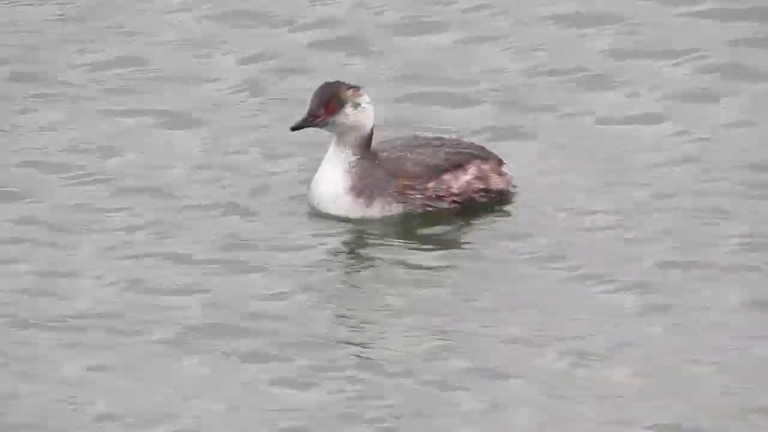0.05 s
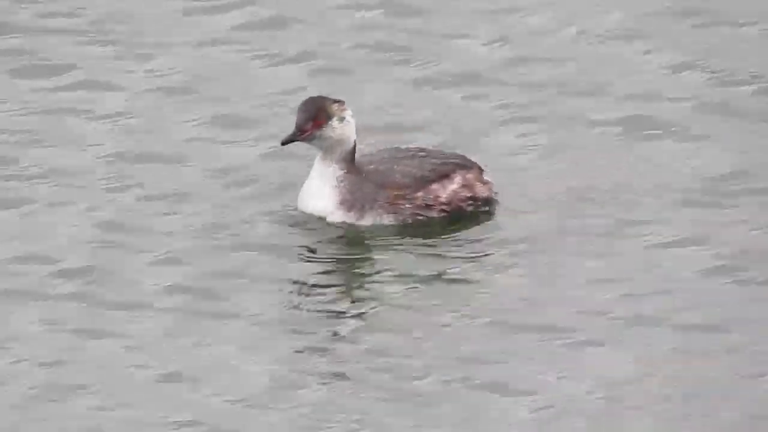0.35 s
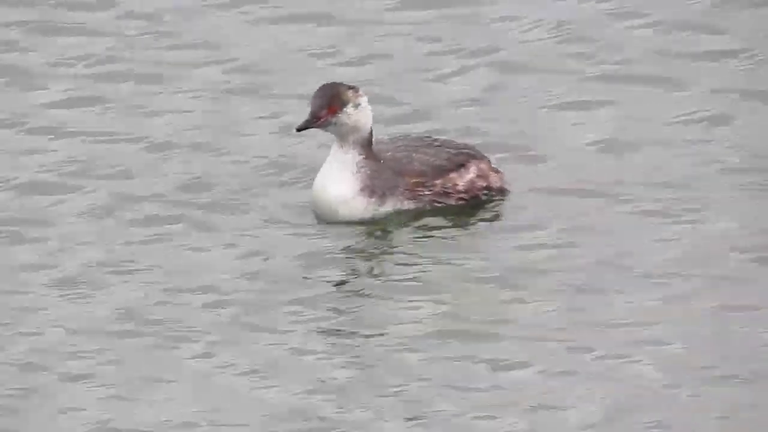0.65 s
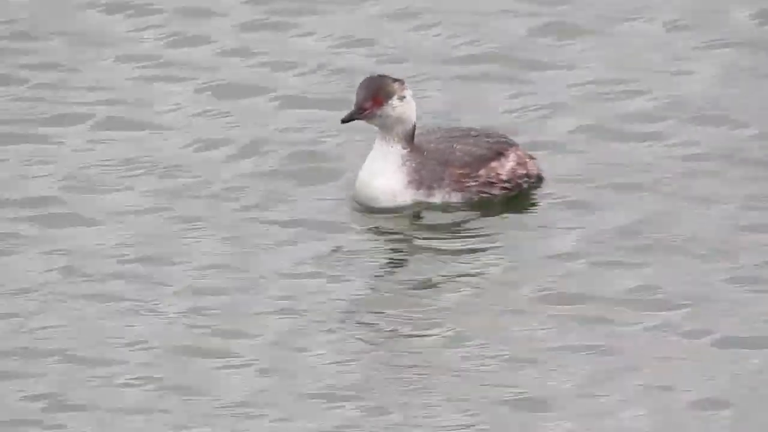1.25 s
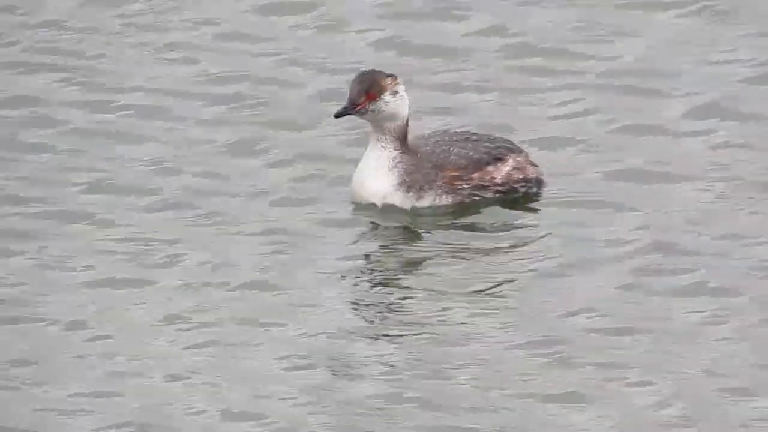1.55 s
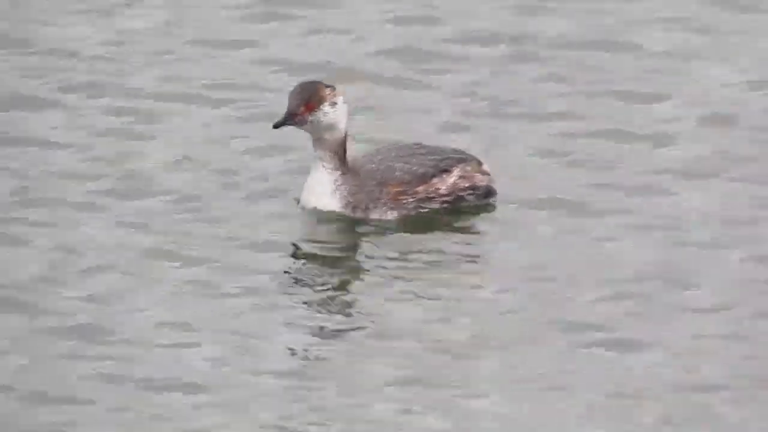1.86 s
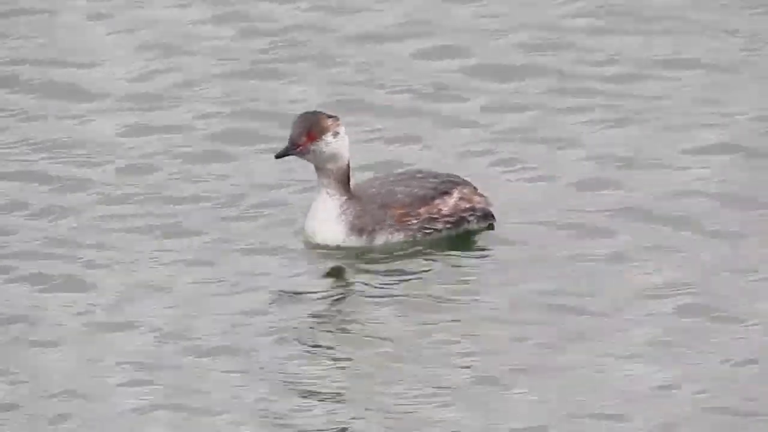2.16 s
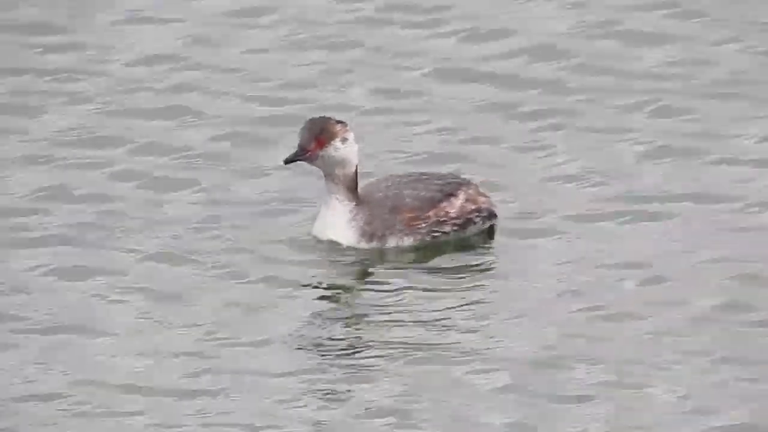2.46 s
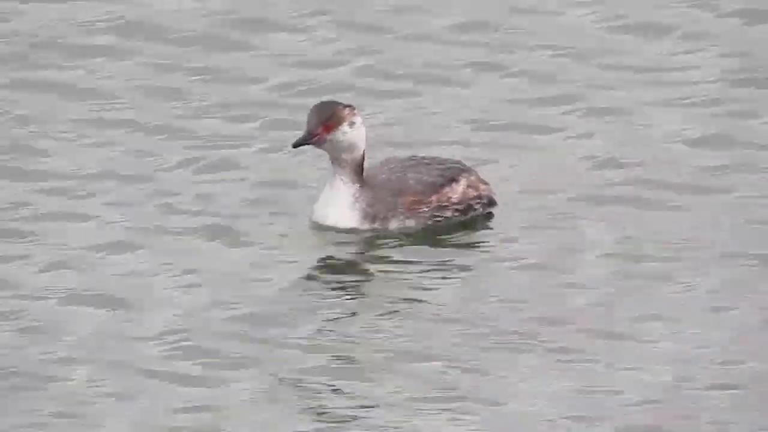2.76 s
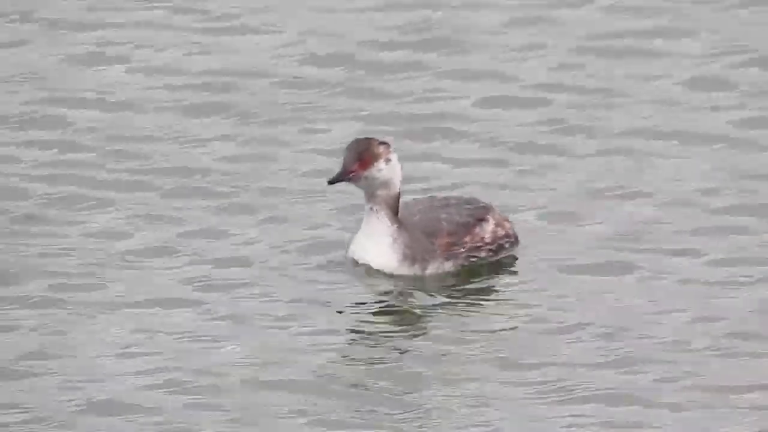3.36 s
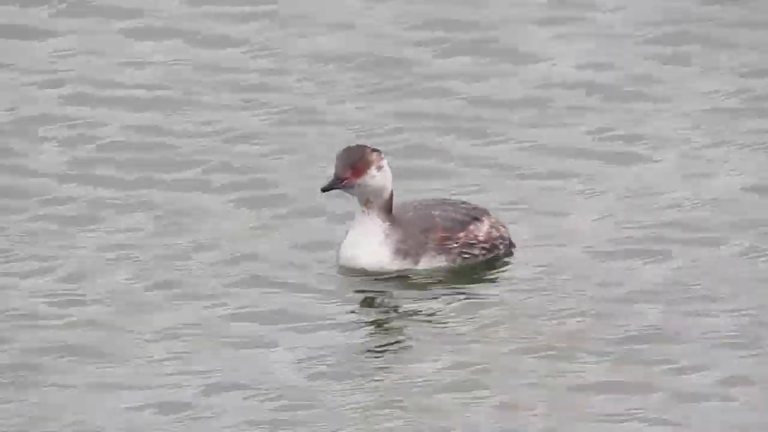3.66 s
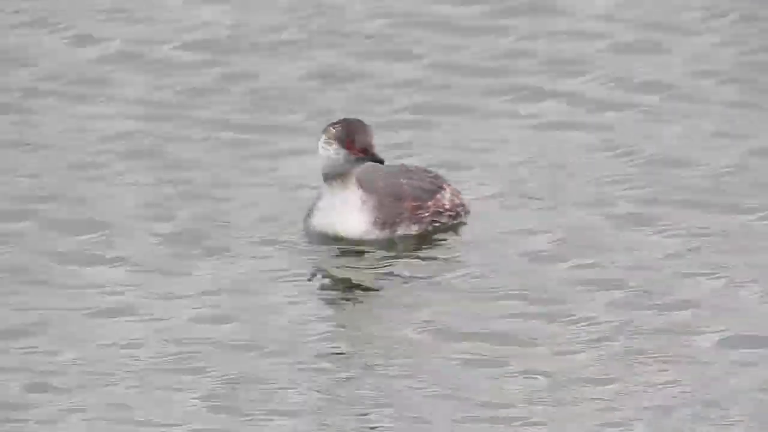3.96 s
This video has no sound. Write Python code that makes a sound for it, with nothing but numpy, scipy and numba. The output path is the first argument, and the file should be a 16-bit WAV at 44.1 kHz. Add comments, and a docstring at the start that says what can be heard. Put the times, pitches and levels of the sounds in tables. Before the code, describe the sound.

Faint honks and squeals from distant water birds recur throughout beside a lake. Low wind flutters close on the microphone, thumping once near the start and twice in the second half, with the birds briefly quieter afterward.

```python
"""Water birds call far across a lake: thin, arching honks and squeals, each a harmonic series on a
gliding fundamental, with a few high chips over a faint wash of open air. Turbulent wind rumbles on two
microphone ports, largely in opposite phase left and right. The hardest buffets overload the microphone
like knocks, and its gain control ducks the whole lake and slowly lets it back."""
import sys
import numpy as np
from scipy import signal
from scipy.fft import rfft, irfft
from scipy.io import wavfile
from scipy.ndimage import uniform_filter1d
from numba import njit

SR = 44100
rng = np.random.default_rng(int(sys.argv[2]) if len(sys.argv) > 2 else 0)


def store_wav(level_fs):
    """Save 16-bit WAV to argv[1]."""
    pcm = np.round(np.clip(np.atleast_2d(level_fs), -1, 1) * 32767)
    wavfile.write(sys.argv[1], SR, pcm.T.astype(np.int16))


N = 176400


def undb(db):
    """The decibel is logarithmic: 20 dB is a factor of ten in amplitude."""
    return 10 ** (np.asarray(db) / 20)


def unit(x):
    """Normalisation to an rms of 1."""
    return x / np.sqrt(np.mean(x ** 2))


def colour(x, points):
    """Zero-phase filtering by a curve of (frequency [Hz], gain [dB])."""
    hz, db = np.array(points, float).T
    f = np.maximum(np.fft.rfftfreq(N, 1 / SR), 1)
    return irfft(rfft(x) * undb(np.interp(np.log(f), np.log(hz), db)), N)


def drift(rate, size):
    """Random modulation: smoothed noise of spread near 1, changing rate times a second."""
    hold = max(int(SR / rate), 1)
    steps = np.repeat(rng.standard_normal(2000), hold)[:size]
    return 1.7 * uniform_filter1d(uniform_filter1d(steps, hold), hold)


def stereo(mid, side):
    """Sum and difference: mid is in phase left and right, side in antiphase."""
    return np.array([mid + side, mid - side])


def air():
    """Ripples and the far shore add incoherently to a faint wash of noise, fading into hiss."""
    # spectrum of open air over water: (frequency [Hz], relative density [dB])
    spectrum = [(40, 8), (200, 13), (400, 5.5), (700, -10), (1200, -6.5), (1900, -13), (3000, -23),
                (4500, -30), (7000, -32), (10000, -34.5), (12500, -36.5), (14000, -39.5)]
    # stereo width: (frequency [Hz], side re mid [dB])
    width = [(60, -1.5), (200, -17), (1000, -5.5), (2500, -11.5), (5000, -4.5), (10000, 1)]
    level_db, flicker_db = -48.5, -0.3
    mid, side = (unit(colour(rng.standard_normal(N), spectrum)) * undb(flicker_db * drift(18, N))
                 for _ in range(2))
    return undb(level_db) * stereo(mid, colour(side, width))


def eddies(edge_hz, size):
    """Turbulent pressure: low noise of even strength, as the sum and difference of two ports."""
    # response of the ports to turbulence: (frequency [Hz], gain [dB])
    port_response = [(20, 5.5), (50, 0), (90, 1.5), (150, 2), (300, -4), (500, -6.5), (700, -20),
                     (1000, -4.5), (1600, -18), (3000, -25)]
    low_hz, rolloff_order = 58, 3.02
    f = np.fft.rfftfreq(size, 1 / SR)
    band = f ** 2 / (f ** 2 + low_hz ** 2) / np.sqrt(1 + (f / edge_hz) ** (2 * rolloff_order))
    band *= undb(np.interp(f, *np.array(port_response).T))
    pressure = irfft(rfft(rng.standard_normal((2, size))) * band, size)
    window = int(0.016 * SR)
    power = uniform_filter1d(pressure ** 2, window, mode="wrap")
    return pressure / np.sqrt(uniform_filter1d(power, window, mode="wrap"))


def wind():
    """Turbulence of a breeze and its buffets; the microphone magnifies the ports' pressure difference."""
    # envelope of the breeze: (time [s], relative level [dB])
    breeze = [(0, -52), (.17, -56), (.3, -39), (.62, -49), (.85, -44.5), (1.17, -52), (1.45, -44.5),
              (1.8, -41.5), (2.25, -59.5), (2.5, -30.5), (2.66, -49.5), (3.0, -36.5), (3.25, -41),
              (3.42, -34.5), (3.68, -43.5), (3.82, -63), (4, -54.5)]
    # Gaussian buffets: (centre [s], half width [s], relative level [dB], upper edge [Hz])
    buffets = [ (0.213, .015, -36.5, 197), (0.294, 0.0066, -35.5, 274), (0.334, 0.003, -16.5, 210),
               (0.353, 0.0065, -20.5, 397), (0.4, 0.016, -18.5, 346), (0.416, 0.0031, -14.5, 760),
               (0.502, 0.056, -32.5, 245), (0.536, 0.004, -34, 514), (0.736, 0.015, -45, 263),
               (0.94, 0.017, -28, 219), (1.092, 0.015, -29.5, 226), (1.248, 0.03, -38.5, 168),
               (1.526, 0.012, -27, 295), (1.542, 0.0047, -21.5, 330), (1.669, 0.075, -39.5, 208),
               (1.826, 0.01, -35, 141), (1.854, 0.012, -28, 222), (2.091, 0.047, -42, 189),
               (2.38, 0.023, -27.5, 222), (2.404, 0.0063, -16.5, 520), (2.418, 0.0091, -17, 345),
               (2.438, 0.02, -21, 369), (2.565, 0.005, -41.5, 220), (2.621, 0.0049, -33.5, 235),
               (2.715, 0.0092, -26.5, 261), (2.757, 0.0041, -26, 414), (2.776, .01, -23.5, 352),
               (2.815, 0.014, -26, 362), (2.867, 0.008, -25, 310), (2.899, 0.014, -30, 317),
               (2.957, 0.013, -30.5, 239), (3.045, 0.011, -28, 177), (3.072, 0.007, -24, 272),
               (3.103, 0.0052, -19, 266), (3.124, 0.0053, -12, 422), (3.138, 0.0086, -10, 473),
               (3.155, 0.0058, -13.5, 330), (3.25, .015, -40, 316), (3.354, 0.0051, -32.5, 348),
               (3.43, 0.013, -38.5, 390), (3.532, 0.013, -21.5, 297), (3.629, 0.013, -29.5, 274)]
    # boost of the difference between the ports: (frequency [Hz], gain [dB])
    widening = [(30, 7.5), (80, 15), (300, 10.5), (500, 14), (720, 9.5), (1100, 3), (2000, 8)]
    flutter_db, flutter_per_s = 5, 27
    t = np.arange(N) / SR
    ports = eddies(edge_hz=130, size=N)
    ports *= undb(np.interp(t, *np.array(breeze).T) + flutter_db * drift(flutter_per_s, N))
    for centre, half_width, db, edge_hz in buffets:
        near = np.arange(SR // 2) + max(int(centre * SR) - SR // 4, 0)
        swell = np.exp(-.5 * ((t[near] - centre) / half_width) ** 2)
        puff = eddies(edge_hz, size=len(near)) * swell
        ports[:, near] += undb(db) * puff * np.linalg.norm(swell) / np.linalg.norm(puff, axis=1)[:, None]
    return stereo(ports[0], colour(ports[1], widening))


def knocks():
    """Pressure transients in antiphase: each pushes one port and pulls the other for a cycle or so."""
    # jolts of wind pressure: (time [s], relative level [dB], ring frequency [Hz])
    pulses = [(0.406, 5, 217), (2.395, 2, 199), (2.4, 4, 373), (2.417, 0, 215), (3.121, 3.5, 169),
              (3.130, 8, 334), (3.138, 5.5, 169), (3.145, 3, 301)]
    half_width_s, common_share = 0.001253, 0.17
    t, jolts = np.arange(N) / SR, np.zeros(N)
    for centre, db, hz in pulses:
        near = abs(t - centre) < 10 * half_width_s
        since = t[near] - centre
        envelope = undb(db) * np.exp(-.5 * (since / half_width_s) ** 2)
        jolts[near] += envelope * np.cos(2 * np.pi * hz * since)
    return stereo(common_share * jolts, jolts)


def chip(length, hz, db):
    """A falling frequency sweep on a pure tone: a short whistle, perhaps of a small bird."""
    fall_hz_per_s = 2800
    t = np.arange(int(length * SR)) / SR
    pitch = hz * (1 + 0.01 * drift(200, len(t))) - fall_hz_per_s * t
    return undb(db) * np.hanning(len(t)) * np.sin(2 * np.pi * np.cumsum(pitch) / SR)


def call(length, opening_hz, middle_hz, closing_hz, first_db, second_db, rasp_depth):
    """Three harmonics on a parabola of pitch; frequency and amplitude modulation make a call hoarse."""
    attack_s, release_s, shimmer_db = 0.013, 0.031, 1.2
    waver, rasp_swing, rasp_hz = .0035, 0.048, 175
    t = np.arange(int(length * SR)) / SR
    hz = np.polyval(np.polyfit([0, .5, 1], [opening_hz, middle_hz, closing_hz], 2), t / length)
    hz *= 1 + waver * drift(70, len(t)) + rasp_swing * rasp_depth * drift(2 * rasp_hz, len(t))
    phase = 2 * np.pi * np.cumsum(hz) / SR
    rasp_rate = rasp_hz * (1 + 0.35 * drift(86, len(t)))
    rasp = 1 + rasp_depth * np.sin(2 * np.pi * np.cumsum(rasp_rate) / SR)
    effort = np.interp(t / length, [0, 0.57, 1], [-.5, .5, -.5])  # louder and brighter at the crest
    harmonics = [(1, first_db, 1.5), (2, second_db, 4), (3, second_db - 18.5, 4)]
    tone = sum(undb(db + swell_db * effort + shimmer_db * drift(60, len(t))) * np.sin(number * phase)
               for number, db, swell_db in harmonics)
    envelope = np.minimum(t / attack_s, 1) * np.minimum((length - t) / release_s, 1)
    return np.sqrt(2) * tone * rasp * envelope


def birds():
    """Direct sound from ahead, a lateral reflection off the bank and diffuse reverberation off the shore."""
    # water birds' calls: (start [s], length [s], opening pitch [Hz], middle pitch [Hz],
    # closing pitch [Hz], fundamental [relative dB], second harmonic [relative dB], rasp depth [0-1])
    calls = [ (0.014, 0.045, 1810, 1835, 1860, -55.5, -79.5, 0.29),
             (0.038, 0.16, 2160, 2160, 2037, -61, -72.5, 0.096),
             (0.054, 0.072, 1390, 1306, 1377, -59.5, -72, 0.22),
             (0.188, 0.065, 1394, 1446, 1380, -63, -71, 0.27),
             (.27, 0.12, 2000, 1980, 1910, -70.5, -89, 0.12),
             (0.431, 0.069, 2020, 1970, 1890, -65, -88, .05),
             (.432, 0.073, 1505, 1480, 1435, -76, -72.5, 0.062),
             (0.478, 0.064, 1910, 1810, 1770, -65, -69, 0.01),
             (0.438, 0.1, 1302, 1305, 1360, -60.5, -90, .08),
             (.535, 0.19, 2330, 2345, 2390, -68.5, -78.5, 0.066),
             (0.637, 0.069, 1696, 1884, 2060, -57, -85, 0.13),
             (.686, 0.17, 2176, 2118, 2054, -62.5, -65, 0.092),
             (0.725, 0.092, 1099, 998, 930, -56, -75, 0.13),
             (0.849, 0.12, 1360, 1300, 1425, -53.5, -78, 0.86),
             (0.922, 0.079, 1490, 1450, 1380, -50.5, -67.5, 0.19),
             (.965, 0.05, 1453, 1300, 1160, -63, -60, 0.15),
             (0.991, 0.055, 1288, 1189, 1110, -50.5, -83, 0.19),
             (1.064, 0.046, 1410, 1364, 1370, -57.5, -76, 0.1),
             (1.06, 0.032, 1950, 1885, 1910, -56, -85, 0.06),
             (1.37, 0.039, 2240, 2160, 2170, -67.5, -106, 0.091),
             (1.387, 0.11, 1286, 1304, 1285, -54.5, -78, 0.077),
             (1.502, 0.09, 1272, 1240, 1096, -55, -87, 0.17),
             (1.568, 0.12, 1121, 1051, 940, -60, -81.5, 0.11),
             (1.575, 0.057, 1850, 1836, 1860, -64, -90, 0.11),
             (1.605, 0.054, 1407, 1403, 1390, -60.5, -84, 0.16),
             (1.787, 0.094, 1290, 1308, 1350, -53, -85, 0.11),
             (1.799, 0.039, 1465, 1430, 1390, -62, -60.5, 0.093),
             (1.843, 0.14, 1376, 1301, 1207, -55, -62.5, 0.12),
             (1.94, 0.048, 1850, 1783, 1810, -61, -92, 0.12),
             (1.965, 0.085, 1244, 1092, 1090, -66, -109, 0.22),
             (2.22, 0.13, 1353, 1374, 1440, -62, -83, 0.46),
             (2.288, 0.054, 1596, 1810, 1800, -58.5, -84, 0.15),
             (2.332, 0.14, 1335, 1310, 1323, -56.5, -76, 0.39),
             (2.448, 0.15, 1212, 1082, 900, -57.5, -84, 0.25),
             (2.687, 0.086, 1700, 1780, 1930, -57.5, -91, 0.44),
             (2.695, 0.063, 1330, 1355, 1360, -76, -68.5, 0.14),
             (2.736, .085, 2095, 2185, 2225, -55.5, -67, 0.046),
             (2.788, 0.079, 2184, 2170, 2040, -56.5, -60.5, 0.1),
             (2.766, 0.025, 1260, 1170, 1120, -54, -75, 0.18),
             (2.782, 0.083, 1320, 1340, 1320, -50.5, -79, 0.087),
             (2.871, 0.11, 2010, 1920, 1820, -65.5, -79, 0.26),
             (2.935, 0.068, 1356, 1396, 1460, -55.5, -78, 0.096),
             (3.188, 0.095, 1365, 1280, 1310, -66.5, -88, 0.077),
             (3.298, 0.064, 1430, 1397, 1410, -59, -84, 0.044),
             (3.545, 0.11, 1223, 1317, 1290, -53, -85, 0.078),
             (3.638, 0.057, 1050, 1098, 1080, -52.5, -73, 0.51),
             (3.674, 0.08, 1500, 1430, 1160, -53, -67, 0.16),
             (3.75, 0.038, 1110, 1150, 1170, -58, -84, 0.024)]
    # high whistles: (start [s], length [s], opening pitch [Hz], relative level [dB])
    chips = [(.06, .06, 5350, -77), (1.42, .06, 5950, -75), (1.425, .05, 5250, -80)]
    level_db, bank_db, bank_delay_s = -1, -12, 0.0049
    shore_db, shore_t60_s, shore_rise_s = -16, .2, 0.012
    direct = np.zeros(2 * N)
    for source, events in ((call, calls), (chip, chips)):
        for start, *shape in events:
            voice, i = source(*shape), int(start * SR)
            direct[i:i + len(voice)] += voice
    t = np.arange(SR) / SR
    decay = np.exp(-np.log(1000) * t / shore_t60_s) * (1 - np.exp(-t / shore_rise_s))
    tails = rng.standard_normal((2, SR)) * decay
    shore_mid, shore_side = (
        undb(shore_db) * signal.fftconvolve(direct[:N], tail / np.linalg.norm(tail))[:N]
        for tail in tails)
    bank = undb(bank_db) * np.roll(direct, int(bank_delay_s * SR))[:N]
    return undb(level_db) * stereo(direct[:N] + shore_mid, shore_side + bank)


def scene():
    """Superposition of birds, open air, wind and its knocks at the microphone."""
    return birds() + air() + wind() + knocks()


@njit
def duck(excess_db, attack_s, release_s, start_db):
    """An envelope follower: gain reduction in dB grows with the attack and fades with the release."""
    cut_db, held_db = np.empty(len(excess_db)), start_db
    for i in range(len(excess_db)):
        time_constant = attack_s if excess_db[i] > held_db else release_s
        held_db += (excess_db[i] - held_db) / (time_constant * SR)
        cut_db[i] = held_db
    return cut_db


def overload(x):
    """Nonlinear distortion: the microphone crackles above a knee and clips at full scale."""
    # spectrum of the crackle: (frequency [Hz], gain [dB])
    spectrum = [(200, -7), (2000, -4.5), (5000, -20.5), (10000, -21.5), (13000, -21)]
    knee, crackle_db = 0.19, -38
    clipped = np.clip(x, -1, 1)
    strain = np.maximum(abs(clipped) - knee, 0)
    return clipped + undb(crackle_db) * strain * colour(rng.standard_normal((2, N)), spectrum)


def record(dry):
    """Compression acts late, so the hardest buffets clip before it ducks; a low-pass trims the top."""
    # response of the recorder: (frequency [Hz], gain [dB])
    response = [(10, -20), (40, 0), (9000, 0), (11500, -2), (13000, -7), (15500, -12)]
    knee_db, slope, lag_s, top_hz = -7.5, 0.84, .026, 15600
    peak_db = 20 * np.log10(abs(dry).max(axis=0) + 1e-9)
    excess_db = slope * np.maximum(peak_db - knee_db, 0)
    cut_db = duck(excess_db, attack_s=0.0012, release_s=0.96, start_db=6.5)
    t = np.arange(N) / SR
    clipped = overload(dry * undb(-np.interp(t - lag_s, t, cut_db)))
    lowpass = signal.ellip(8, .1, 70, top_hz, fs=SR, output="sos")
    return signal.sosfilt(lowpass, colour(clipped, response))


dry = scene()
out = record(dry)
store_wav(out)
```